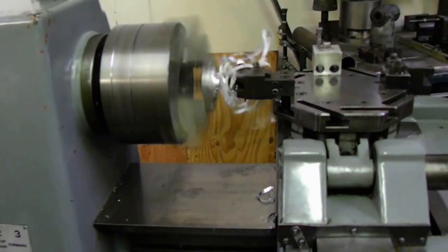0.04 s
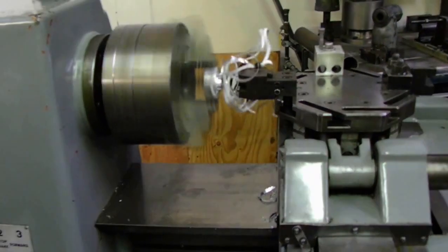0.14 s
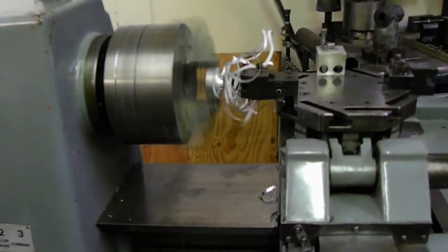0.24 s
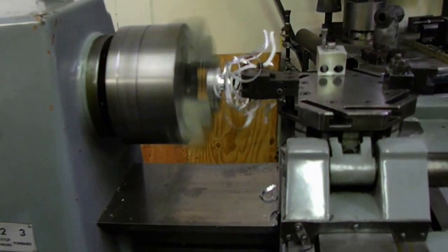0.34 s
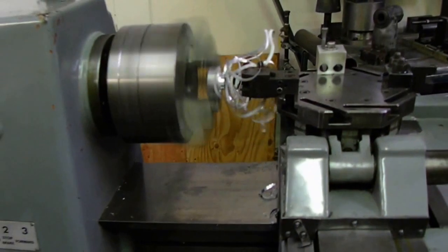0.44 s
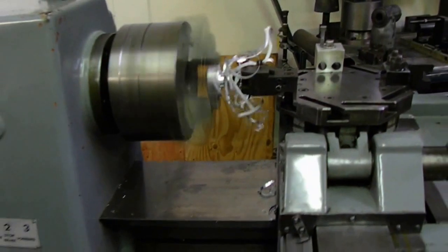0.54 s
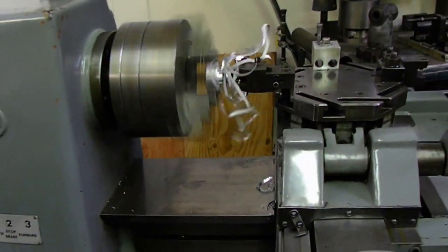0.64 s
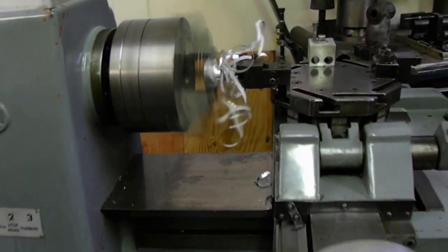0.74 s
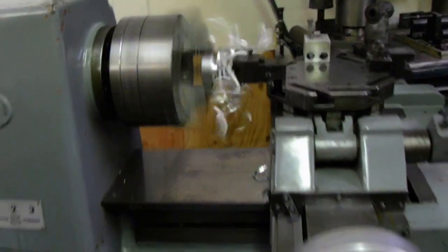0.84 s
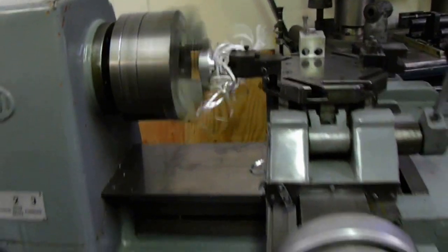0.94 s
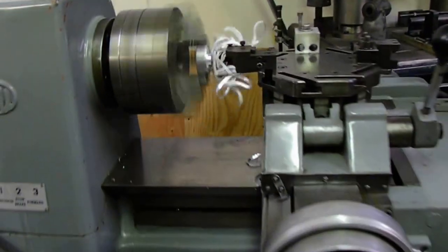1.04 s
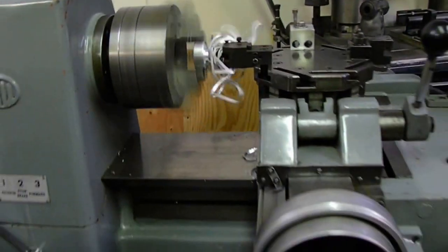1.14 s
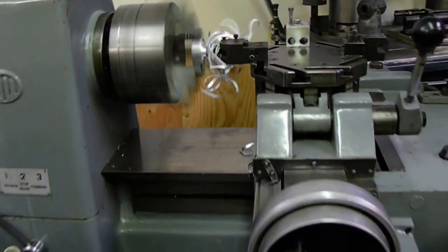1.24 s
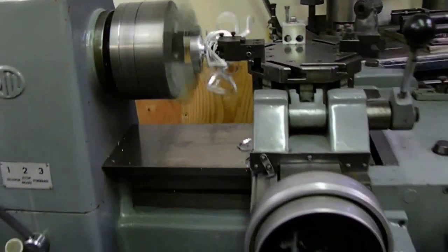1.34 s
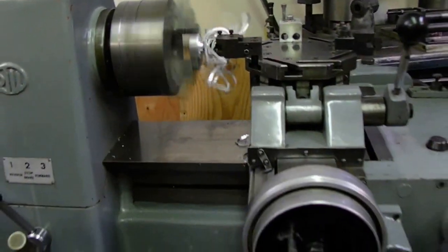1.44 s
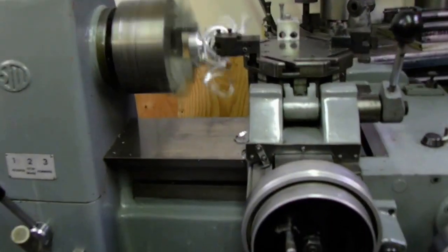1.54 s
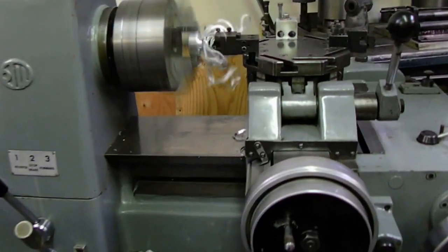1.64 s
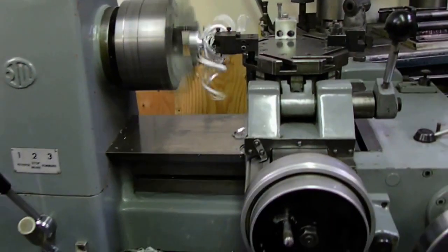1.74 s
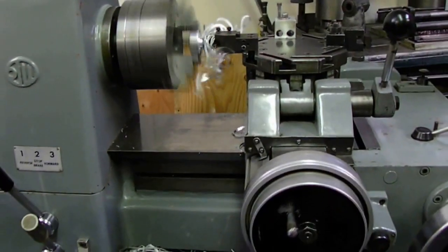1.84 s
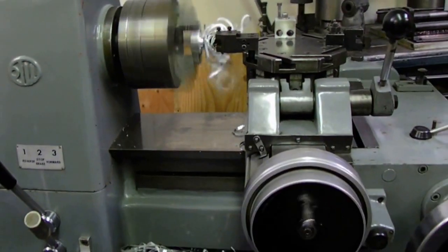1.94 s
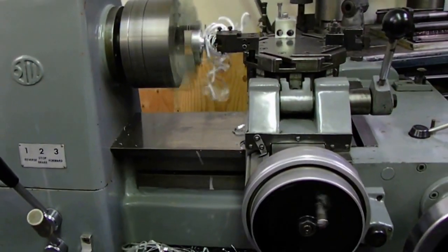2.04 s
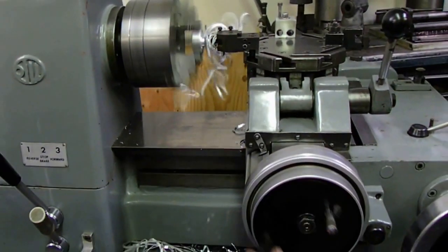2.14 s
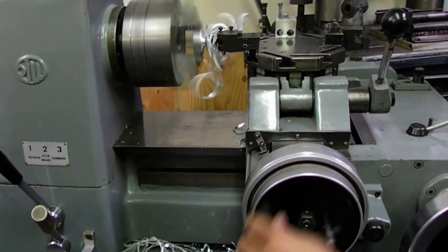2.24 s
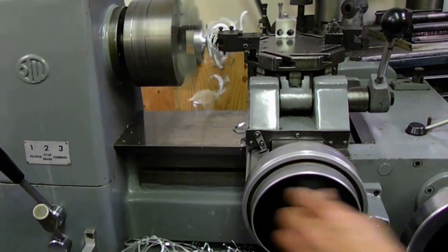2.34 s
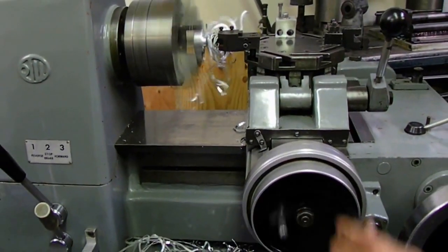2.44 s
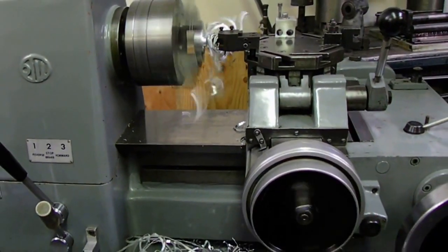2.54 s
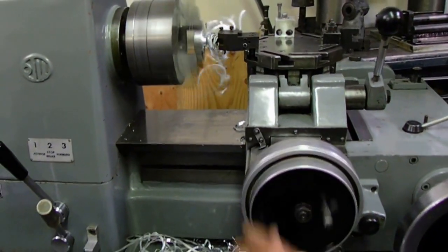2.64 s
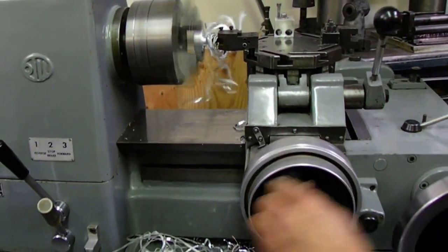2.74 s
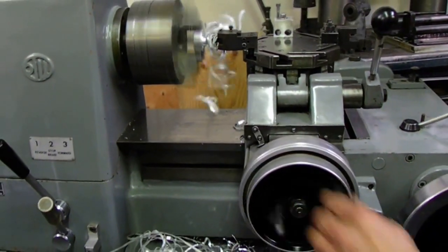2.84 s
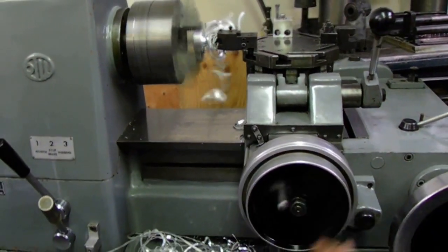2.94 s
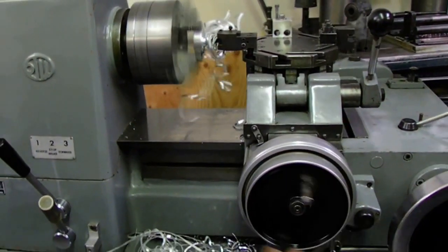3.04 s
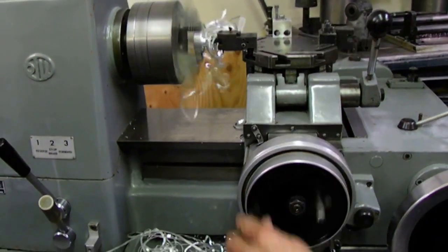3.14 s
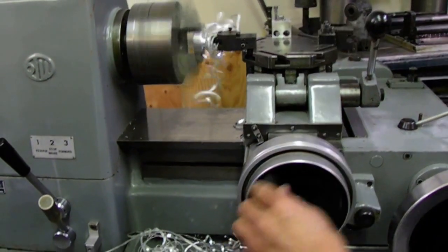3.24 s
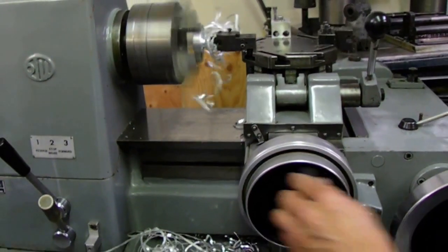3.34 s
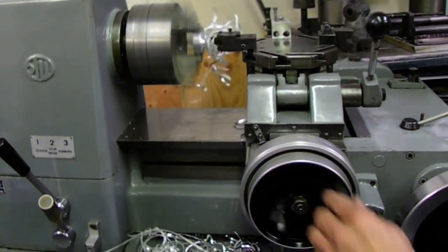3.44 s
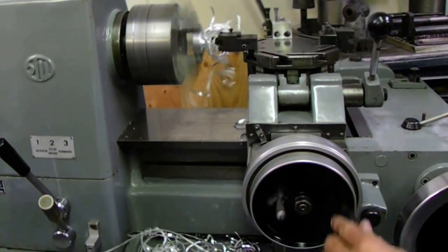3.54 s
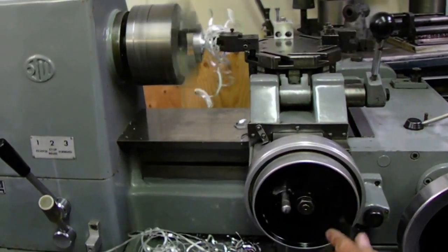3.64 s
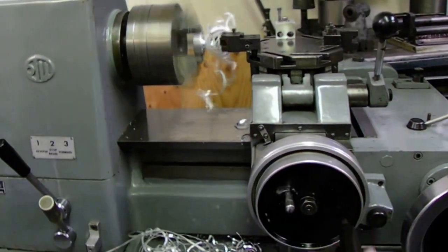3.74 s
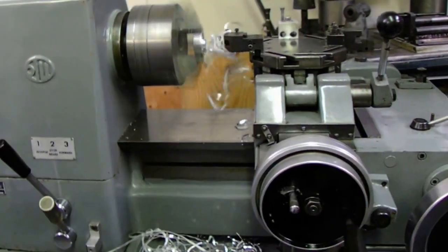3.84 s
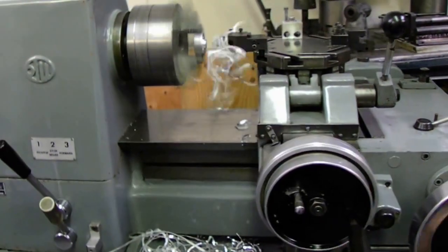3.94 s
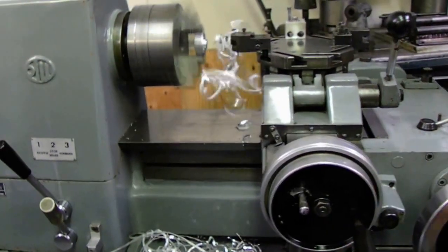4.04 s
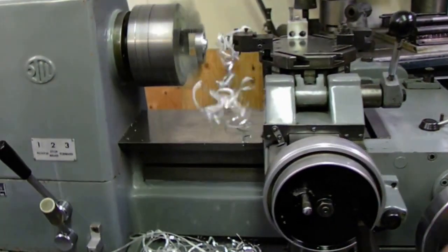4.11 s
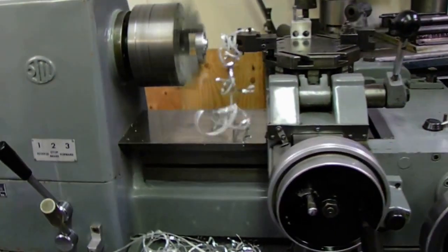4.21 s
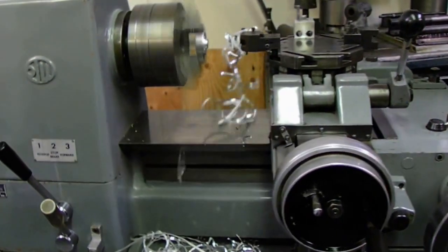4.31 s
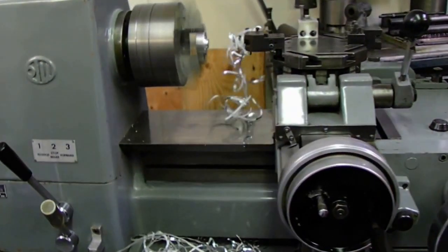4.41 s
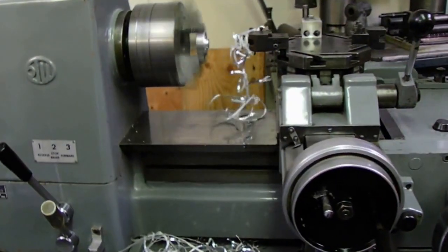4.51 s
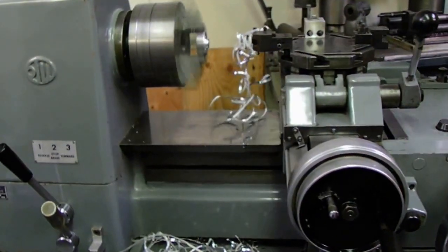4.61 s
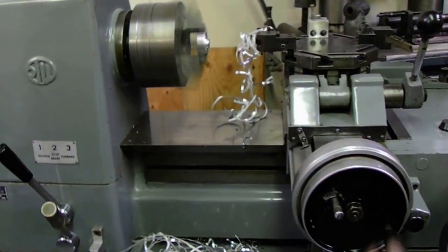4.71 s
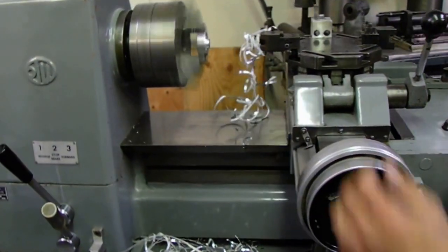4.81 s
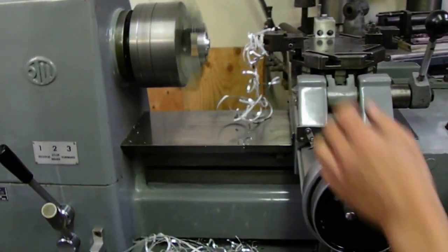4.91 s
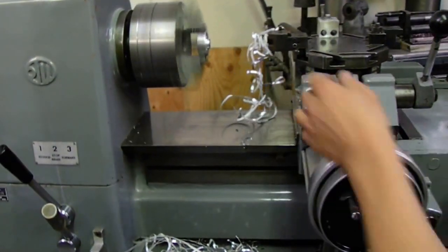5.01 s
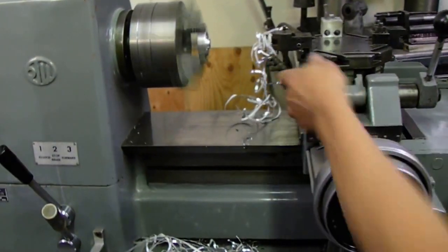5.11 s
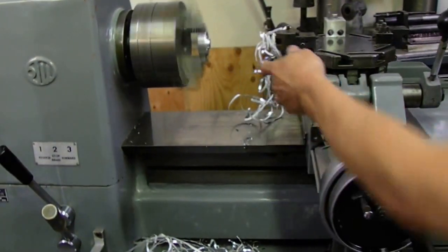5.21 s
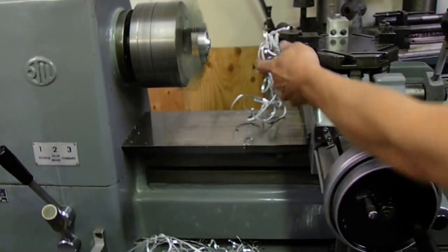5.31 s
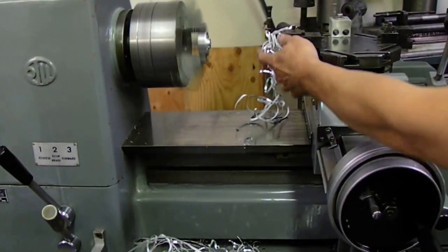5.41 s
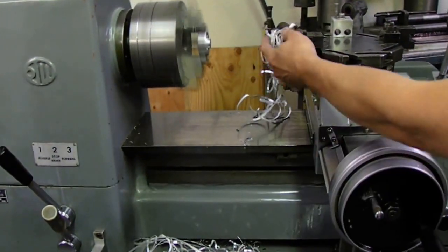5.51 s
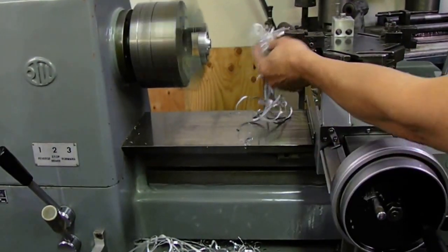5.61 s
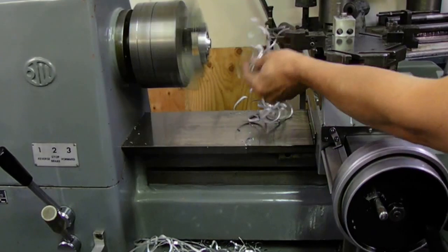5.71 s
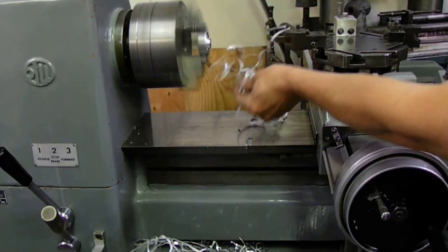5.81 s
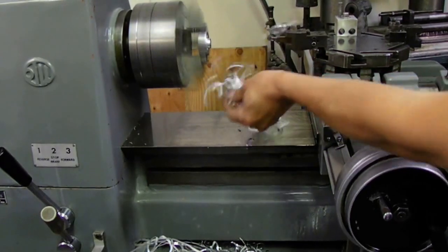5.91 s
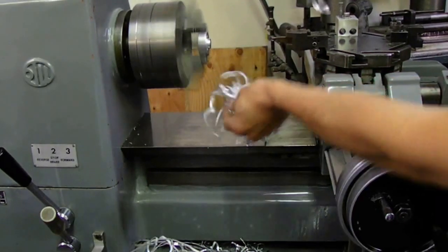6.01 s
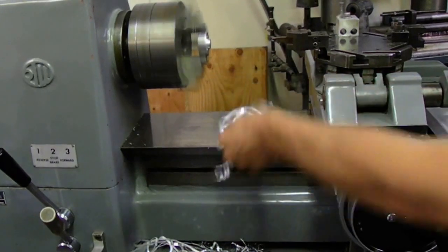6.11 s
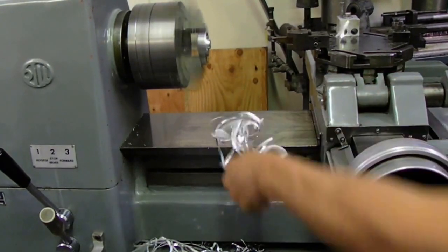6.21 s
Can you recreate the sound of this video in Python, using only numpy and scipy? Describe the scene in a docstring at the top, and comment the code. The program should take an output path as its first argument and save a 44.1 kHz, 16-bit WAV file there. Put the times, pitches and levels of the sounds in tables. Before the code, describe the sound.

A geared metal lathe rumbles and whines close to the microphone in a workshop. Its tool cuts with a high squeal that weakens and stops, while curly swarf scrapes and lashes the spinning chuck in a bright, scratchy hiss. The scraping dies away and the gears run on, with light metallic ticks and one lever knock. Finally, a tangle of shavings is dragged away with a crisp rustle.

```python
"""A workshop, one small microphone close to a geared metal lathe. The headstock rumbles and its gears whine.
The tool takes a cut: the chip shears off and sets it squealing, while curly swarf scrapes and lashes
the spinning chuck. The feed stops and the gears run on; a lever knocks, and a hand drags the tangle
of swarf away."""
import sys
import numpy as np
from scipy import signal
from scipy.fft import rfft, irfft
from scipy.io import wavfile
from scipy.ndimage import map_coordinates

SR = 44100
rng = np.random.default_rng(int(sys.argv[2]) if len(sys.argv) > 2 else 0)


def store_wav(level_fs):
    """Save 16-bit WAV to argv[1]."""
    pcm = np.round(np.clip(np.atleast_2d(level_fs), -1, 1) * 32767)
    wavfile.write(sys.argv[1], SR, pcm.T.astype(np.int16))


N = 276066
TIME, FREQ = np.arange(N) / SR, np.fft.rfftfreq(N, 1 / SR)
SPINDLE_HZ, SHAFT_HZ, BELT_HZ = 18.35, 27.4, 3.28


def gain_of(db):
    """Decibels to amplitude."""
    return 10 ** (np.asarray(db) / 20)


def unit_rms(x):
    """Scales to rms 1."""
    return x / np.sqrt(np.mean(x ** 2) + 1e-20)


def curve(rows, outside_db=None):
    """Level in dB at every sample."""
    return np.interp(TIME, *np.transpose(rows), left=outside_db, right=outside_db)


def ramp(start_s, length_s):
    """Linear rise from 0 to 1."""
    return np.clip((TIME - start_s) / length_s, 0, 1)


def spectrum(points):
    """Level in dB at every frequency."""
    hz, db = np.transpose(points)
    return np.interp(np.log(FREQ + 1), np.log(hz), db)


def colour(x, db):
    """Filters x by a spectrum, to rms 1."""
    return unit_rms(irfft(rfft(x) * gain_of(db), N))


def band(x, hz, width_hz):
    """Gaussian band-pass."""
    return irfft(rfft(x) * np.exp(-((FREQ - hz) / width_hz) ** 2), N)


def drift(hz):
    """Smooth random wander up to about hz, rms 1."""
    return unit_rms(irfft(rfft(rng.standard_normal(N)) * np.exp(-(FREQ / hz) ** 2), N))


def grains(per_s, spread_db):
    """Tiny random impacts, a few larger than the rest."""
    size = gain_of(spread_db * np.minimum(rng.exponential(1, N), 4))
    return unit_rms(size * rng.choice([-1, 1], N) * (rng.random(N) < per_s / SR))


def crowded_modes(spacing_hz):
    """Ripple that countless small modes leave in a steel body's response, rms 1."""
    return unit_rms(rfft(rng.standard_normal(N) * np.exp(-TIME * spacing_hz)).real)


def add(mix, start_s, sound):
    """Mixes a sound in at start_s."""
    part = mix[round(start_s * SR):][:len(sound)]
    part += sound[:len(part)]


def blows(rows, modes, gain_db, scatter, contact_s):
    """Each blow rings the same modes, slightly detuned; contact time softens the onset."""
    out, t = np.zeros(N), np.arange(SR // 4) / SR
    for start_s, db in rows:
        detunes = 1 + scatter * rng.standard_normal(len(modes))
        ring = sum(gain_of(mode_db - 60 * t / t60_s) * np.sin(2 * np.pi * hz * detune * t)
                   for (hz, mode_db, t60_s), detune in zip(modes, detunes))
        onset = 1 - np.exp(-(t / contact_s) ** 2)
        add(out, start_s, gain_of(db + gain_db) * ring * onset)
    return out


def strokes(rows, gain_db, rise_s, fall_s):
    """Power envelope of short scrapes: each bites, holds and lets go."""
    power = np.zeros(N)
    for start_s, db, length_s in rows:
        t = np.arange(int((length_s + .1) * SR)) / SR
        bite = 1 - np.exp(-t / rise_s)
        release = np.exp(-np.maximum(t - length_s, 0) / fall_s)
        add(power, start_s, (gain_of(db + gain_db) * bite * release) ** 2)
    return power


def snags(per_s, size_db, fall_s):
    """Sharp edges catch and slip: sudden, decaying surges in gain."""
    catches = rng.random(N) * (rng.random(N) < per_s / SR)
    surge = signal.lfilter([1], [1, -np.exp(-1 / (fall_s * SR))], catches)
    return np.hypot(1, gain_of(size_db) * unit_rms(surge))


def reflections(x, wet_db, t60_s):
    """Adds dense reflections from the machine and near walls."""
    t = np.arange(SR // 2) / SR
    tail = rng.standard_normal(len(t)) * gain_of(-60 * t / t60_s) * (t > .003)
    return x + gain_of(wet_db) * signal.fftconvolve(x, tail / np.linalg.norm(tail))[:N]


# Running noise as the microphone moves. Each row: time in seconds, relative level in dB.
HEADSTOCK_LEVEL = [(0, -30.5), (.4, -30.5), (1.3, -32), (2.1, -33), (3.3, -30.5), (4.3, -30.5), (5.1, -29),
                   (6.26, -28.5)]
# Its broad colour. Each row: frequency in Hz, relative density in dB.
HEADSTOCK_SPECTRUM = [(25, -30), (70, -22), (190, -22.5), (290, -10.5), (450, -7), (700, -5), (1300, -5),
                      (2100, -4), (2500, -8), (4000, -9), (7000, -10), (9300, -14), (10800, -21.5),
                      (15500, -33)]
# Resonances of casting and covers. Each row: frequency in Hz, width in Hz, lift in dB.
CASTING_MODES = [(107, 44, 13), (146.5, 14, 6), (246.6, 13.3, 10), (556, 78, 7), (678, 113, 6.5),
                 (887, 60, 6), (1019, 250, 8.5), (1710, 370, 2), (1896, 88, 4.5), (3420, 160, 3),
                 (4570, 200, 4), (6860, 300, 3.5)]
# Low boom of the casting. Each row: time in seconds, band gain in dB.
BOOM_GAIN = [(0, -9), (.7, -8), (1.3, 0.5), (5.2, 0.5), (6, 2.5)]


def headstock(gain_db=4.0, throb_depth=0.12, ripple_db=2.24):
    """Teeth and bearings rattle the casting; the mesh band throbs once per drive-shaft turn."""
    modes_db = sum(db / (1 + (2 * (FREQ - hz) / width_hz) ** 4) for hz, width_hz, db in CASTING_MODES)
    treble_db = ripple_db * crowded_modes(spacing_hz=35) * np.minimum(FREQ / 2000, 1) ** 2
    body_db = spectrum(HEADSTOCK_SPECTRUM) + modes_db + treble_db
    rattle = colour(grains(per_s=12000, spread_db=2.0), body_db)
    throb = band(rattle, hz=1000, width_hz=350) * np.cos(2 * np.pi * SHAFT_HZ * TIME)
    boom = band(rattle, hz=230, width_hz=55) * (gain_of(curve(BOOM_GAIN)) - 1)
    return gain_of(curve(HEADSTOCK_LEVEL) + gain_db) * (rattle + throb_depth * throb + boom)


# Motor hum, mesh tones and shaft sidebands. Each row: frequency in Hz, relative level in dB.
GEAR_TONES = [(102.8, -61), (119.9, -62), (358.9, -52), (376.8, -58), (536.9, -45), (543.5, -49),
              (550.1, -49), (693.5, -47), (899.6, -43.5), (927.2, -35.5), (954.8, -46), (1098.9, -46),
              (1314.7, -48), (1476.2, -47), (1499.1, -48), (1554.8, -47), (1584.3, -50), (2002.4, -52)]
# Mesh tones stand out as the load comes off. Each row: time in seconds, gain in dB.
MESH_GAIN = [(0, -4.5), (1.2, -7.5), (2.2, 0), (3.3, -0.5), (4.6, 3), (5.3, 4), (6.0, 6)]


def gear_whine(gain_db=-2.0, wow=0.00054, flutter_db=1.5, rough_rad=0.2):
    """Mesh tones share the wander of the motor's speed; uneven teeth roughen each one."""
    clock_s = np.cumsum(1 + wow * drift(hz=2.94)) / SR
    out = np.zeros(N)
    for hz, db in GEAR_TONES:
        relief_db = curve(MESH_GAIN) * (hz > 200)  # spares the motor hum
        phase = 2 * np.pi * (hz * clock_s + rng.random()) + rough_rad * drift(hz=25)
        out += gain_of(gain_db + db + relief_db + flutter_db * drift(hz=14)) * np.cos(phase)
    return np.sqrt(2) * out


def belt(drive, depth=0.38, seam_s=0.13):
    """The belt's seam loads the input gear once a lap, so its drone swells and sinks."""
    drone = band(drive, hz=541, width_hz=28)
    return drive + depth * drone * np.cos(2 * np.pi * BELT_HZ * (TIME - seam_s))


# Light metallic ticks. Each row: start in seconds, relative level in dB.
METAL_TICKS = [(4.2817, -17.5), (4.4622, -20), (4.569, -21), (4.7795, -21), (4.8688, -25), (4.9835, -20),
               (5.0966, -19.5), (5.1642, -22), (5.2764, -24), (5.5488, -23)]
# Their ring. Each row: frequency in Hz, relative level in dB, T60 in seconds.
TICK_RING = [(6970, -1.5, .018), (8600, -3, 0.018), (9000, 1.5, 0.019), (9730, -3, .018),
             (11300, -13, .012)]


def metal_ticks():
    """Light metallic ticks with a short, high ring, probably chips dropping."""
    return blows(METAL_TICKS, TICK_RING, gain_db=-2.0, scatter=0.011, contact_s=.0003)


# Lever knock. Each row: start in seconds, relative level in dB.
LEVER_KNOCKS = [(4.6671, -9.5)]
# Its ring. Each row: frequency in Hz, relative level in dB, T60 in seconds.
LEVER_RING = [(1540, -12, .025), (1900, 4, 0.0061), (2100, -10, 0.042), (3000, -0.5, 0.0073),
              (3400, -2, 0.011), (4500, -29, .2)]


def lever():
    """A lever knocks home and rings briefly."""
    return blows(LEVER_KNOCKS, LEVER_RING, gain_db=1.0, scatter=0.0062, contact_s=0.00023)


# Tugs that snag the tangle. Each row: start in seconds, relative level in dB, length in seconds.
TANGLE_TUGS = [(5.462, -32, .012), (5.638, -26, .012), (5.798, -20, .01), (5.84, -24, .04),
               (5.991, -18.5, 0.031)]
# Colour of the dragged tangle. Each row: frequency in Hz, relative density in dB.
TANGLE_SPECTRUM = [(500, -27), (2000, -11), (4000, -10), (6000, -2.5), (9500, 1), (12000, -3), (15700, -4)]


def tangle(pull_s=5.575, grip_s=0.1, free_s=6.04, settle_s=0.072,
           held_db=-51, drag_db=-23, carry_db=-30.5):
    """A hand drags the springy curls over the tool post and past the chuck, then carries them off."""
    level_db = held_db + (drag_db - held_db) * ramp(pull_s, grip_s)
    level_db += (carry_db - drag_db) * ramp(free_s, settle_s)
    drag = gain_of(level_db) * (TIME > TANGLE_TUGS[0][0])
    tug_power = strokes(TANGLE_TUGS, gain_db=1.5, rise_s=0.0009, fall_s=0.025)
    catching = snags(per_s=240, size_db=-4, fall_s=.003)
    clicks = grains(per_s=22000, spread_db=1.5) * catching
    return np.sqrt(drag ** 2 + tug_power) * colour(clicks, spectrum(TANGLE_SPECTRUM))


# Colour of chips and spinning swarf. Each row: frequency in Hz, relative density in dB.
SWARF_SPECTRUM = [(500, -21), (2000, -15.5), (3600, -9.5), (5400, -3.5), (6600, 0.5), (8700, 4.5),
                  (10500, 3), (11600, 0.5), (14000, 2), (15700, -1)]


def loose_chips(level_db=-49):
    """Stray chips and the dangling curl touch the bed in faint, sharp clicks."""
    patter = reflections(grains(per_s=70, spread_db=4), wet_db=0, t60_s=.015)
    return gain_of(level_db) * colour(patter, spectrum(SWARF_SPECTRUM))


# Loose curls. Each row: start and end in seconds, relative level in dB, contact in seconds.
LOOSE_CURLS = [(1.123, 1.2, -19.5, 0.014), (1.358, 1.44, -18.5, .014), (1.503, 1.86, -19, 0.013),
               (1.995, 2.18, -22.5, .012), (2.21, 2.4, -19.5, 0.03), (2.426, 2.56, -22.5, 0.018),
               (2.589, 2.67, -19, 0.03)]


def lashes(scatter_db=0.9):
    """Power envelope of curls that each lash the chuck once a turn until they break off."""
    hits = [(hit_s, db, contact_s) for start_s, end_s, db, contact_s in LOOSE_CURLS
            for hit_s in np.arange(start_s, end_s, 1 / SPINDLE_HZ)]
    offsets_db = scatter_db * rng.standard_normal(100)
    uneven = [(hit_s, db + offset_db, contact_s)
              for (hit_s, db, contact_s), offset_db in zip(hits, offsets_db)]
    return strokes(uneven, gain_db=-0.6, rise_s=0.0008, fall_s=0.006)


# Pressure of swarf on the chuck. Each row: time in seconds, relative level in dB.
RUB_LEVEL = [(0.0, -30.5), (0.37, -30.5), (0.81, -29), (1.04, -25.5), (1.28, -28), (1.72, -30.5),
             (2.01, -32.5), (2.18, -32), (2.49, -32), (2.59, -31), (3.33, -24.5), (3.74, -28),
             (3.99, -24.5), (4.05, -24), (4.31, -37), (4.67, -52), (4.75, -52)]
# The bundle swings into the jaws. Each row: start in seconds, relative level in dB, length in seconds.
JAW_SCRAPES = [(.07, -23, 0.094), (.485, -18, 0.011), (2.79, -23.5, .016), (2.86, -20.5, 0.099),
               (3.054, -19, 0.027), (3.19, -25.5, .06), (3.676, -22, .02), (3.82, -17.5, 0.077),
               (4.112, -20, 0.022)]


def swarf(rub_gain_db=5.5, jaw_db=0.4, sway_db=0.5):
    """Thin curls skid over the chuck in tiny clicks, pressed harder twice a turn as the bundle sways."""
    wobble_db = jaw_db * np.sin(2 * np.pi * 2 * SPINDLE_HZ * TIME) + sway_db * drift(hz=10)
    rub = gain_of(curve(RUB_LEVEL, outside_db=-90) + rub_gain_db + wobble_db)
    scrape_power = strokes(JAW_SCRAPES, gain_db=-0.7, rise_s=0.0019, fall_s=0.031)
    pressure = np.sqrt(rub ** 2 + lashes() + scrape_power)
    catching = snags(per_s=300, size_db=-3, fall_s=.004)
    clicks = grains(per_s=22000, spread_db=1.0) * catching
    return pressure * colour(clicks, spectrum(SWARF_SPECTRUM))


# Modes of tool, holder and bar. Each row: nominal frequency in Hz, width in Hz, relative level in dB,
# how closely it follows the force from 0 to 1.
TOOL_MODES = [(1583, 230, -10.5, 0.7), (1820, 86, -17, 1), (2700, 112, -13.5, 0.57), (4240, 280, -12, 0.9),
              (4990, 890, -12.5, 0.55), (6880, 430, -12, 0.5), (7290, 190, -2, 0.72), (8480, 610, -6, 0.18),
              (9260, 190, -14, 0.55), (9850, 150, -9, 0.23), (10600, 200, -14.5, 0.15)]


def cutting(force_db=-19.5, slacken_s=0.55, slacken_db_per_s=6, thin_s=1.04, thinning_s=0.097,
            thin_drop_db=6.5, end_s=1.95, fade_s=0.14, pitch_rise_per_s=.012, nominal_pitch_s=.7):
    """The chip shears in bursts that ring the tool; the feed slackens, the chip thins, the cut ends."""
    thin = ramp(thin_s - thinning_s / 2, thinning_s)
    eased_db = slacken_db_per_s * np.maximum(TIME - slacken_s, 0) + thin_drop_db * thin
    judder_db = 1.5 * drift(hz=140) + 1.3 * thin * drift(hz=30)  # a thin chip comes in fits
    ripple = gain_of(2.7 * crowded_modes(spacing_hz=35))
    squeal = np.zeros(N)
    for hz, width_hz, db, follow in TOOL_MODES:
        detune = 2 * (FREQ - hz) / width_hz
        response = ripple / (1 + 1j * detune) / (1 + 1j * detune / 5.8)  # second pole steepens skirts
        surge_db = 0.4 * drift(hz=30)
        shear = gain_of(judder_db + surge_db) * grains(per_s=7000, spread_db=2.5)
        ring = unit_rms(irfft(rfft(shear) * response, N))
        squeal += ring * gain_of(force_db + db - follow * eased_db)
    pitch_ratio = 1 + pitch_rise_per_s * (TIME - nominal_pitch_s)  # rises as the cut moves along
    rising = map_coordinates(squeal, [np.cumsum(pitch_ratio)], order=3)
    return rising * (1 - ramp(end_s - fade_s / 2, fade_s))


def scene():
    """All sources at one microphone, the same in both channels."""
    impacts = reflections(metal_ticks() + lever(), wet_db=-8, t60_s=.16)
    drive = belt(headstock() + gear_whine())
    mono = drive + cutting() + swarf() + tangle() + loose_chips() + impacts
    return np.array([mono, mono])


def record(dry, notch_hz=7860, notch_width_hz=720, notch_floor=0.03, cutoff_hz=15780):
    """The recorder's deep, narrow treble notch, then its band limit."""
    detune = 2j * (FREQ - notch_hz) / notch_width_hz
    notched = irfft(rfft(dry) * (notch_floor + detune) / (1 + detune), N)
    lowpass = signal.firwin(1023, cutoff_hz, window=("kaiser", 9), fs=SR)
    return signal.oaconvolve(notched, lowpass[None], "same")


dry = scene()
out = record(dry)
store_wav(out)
```